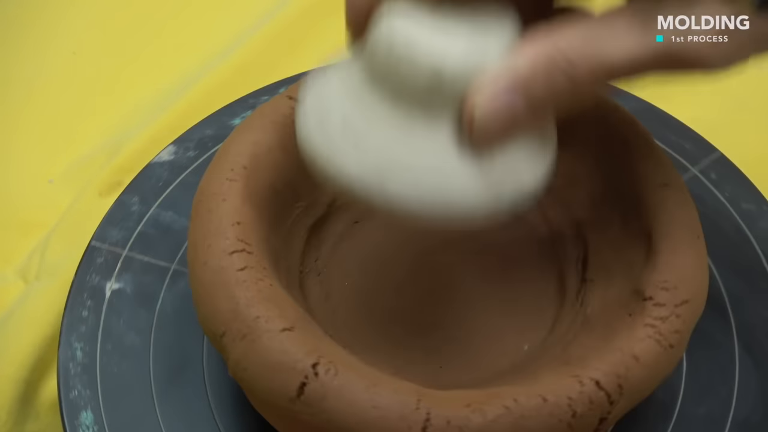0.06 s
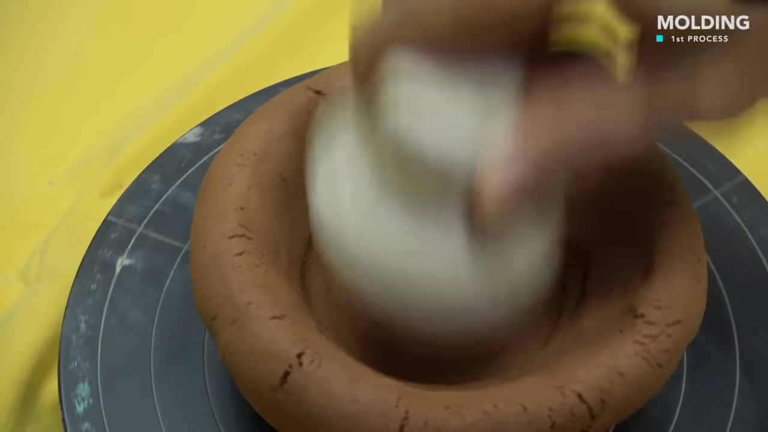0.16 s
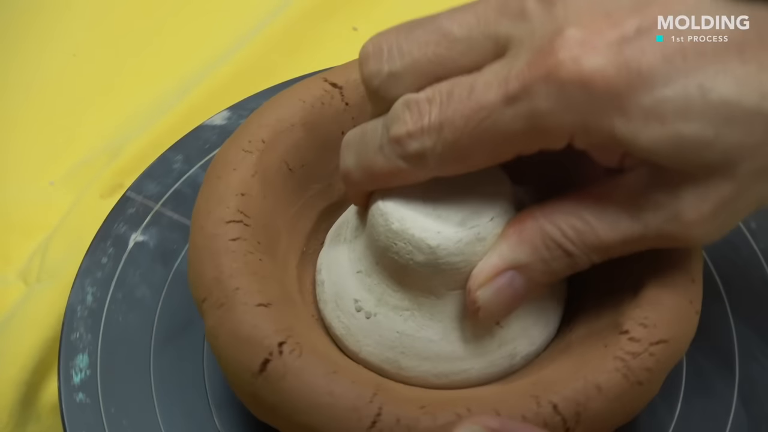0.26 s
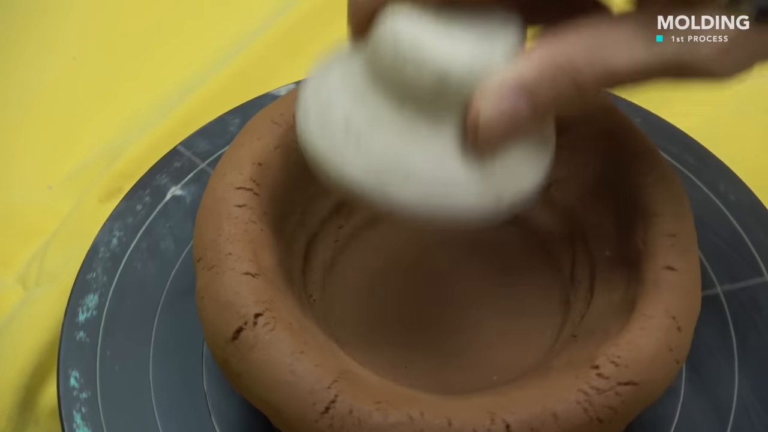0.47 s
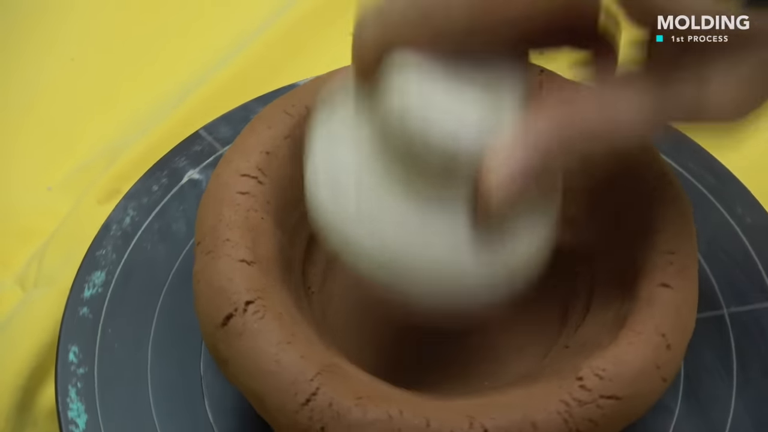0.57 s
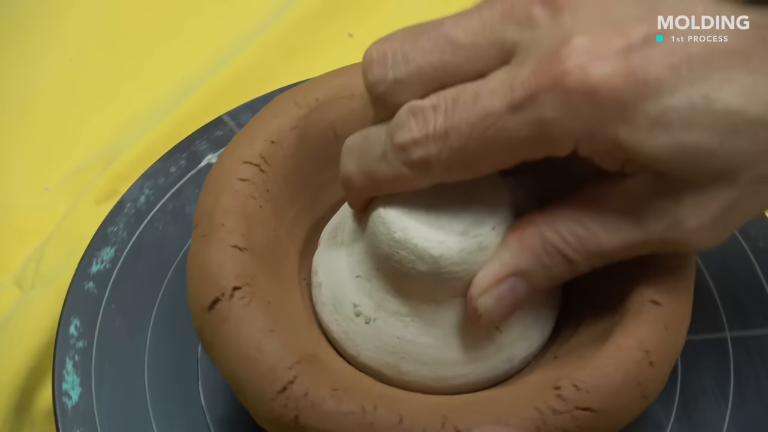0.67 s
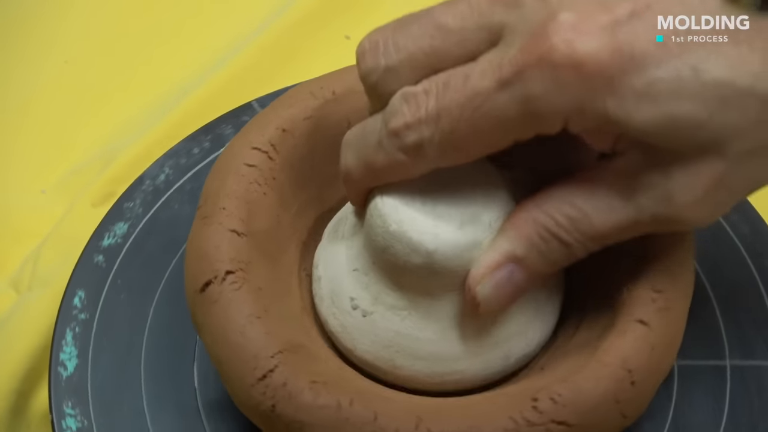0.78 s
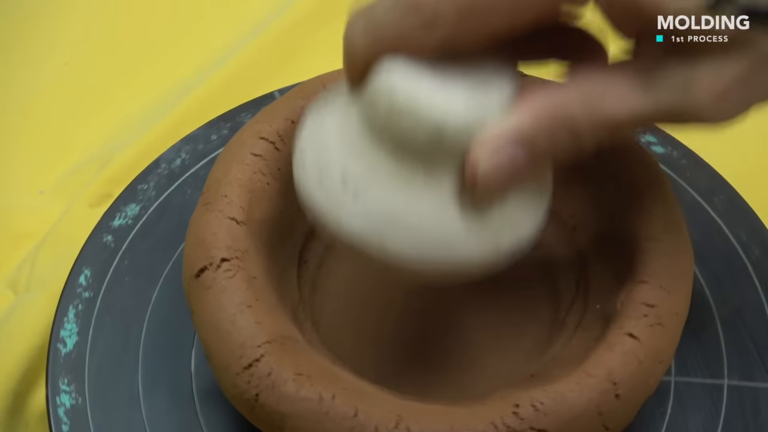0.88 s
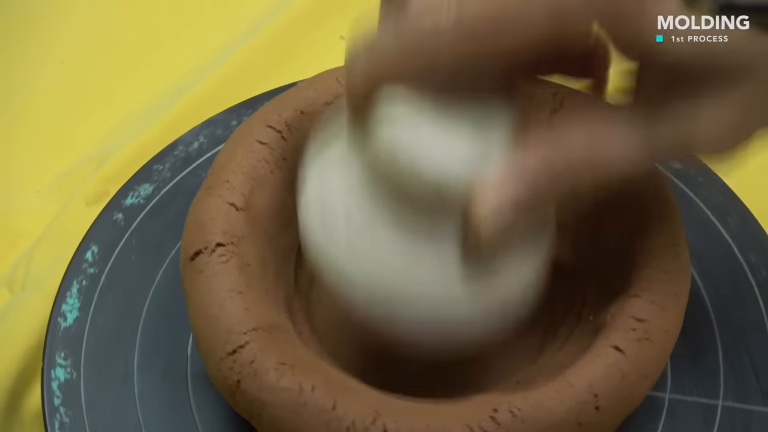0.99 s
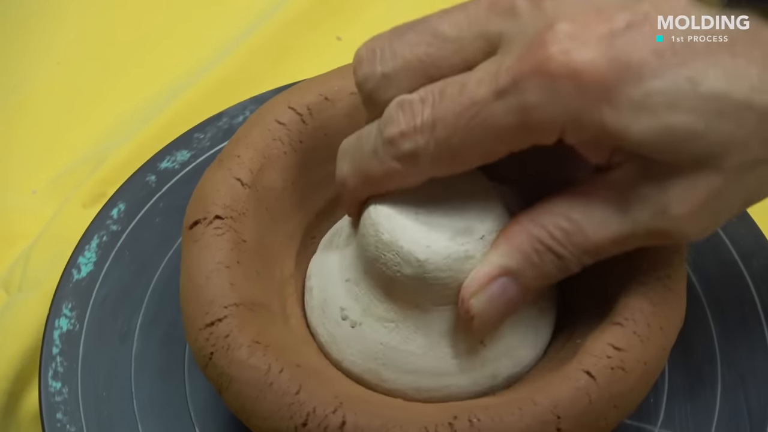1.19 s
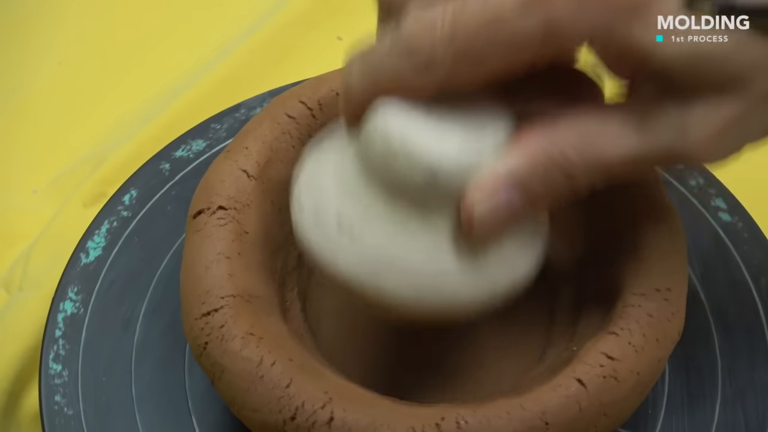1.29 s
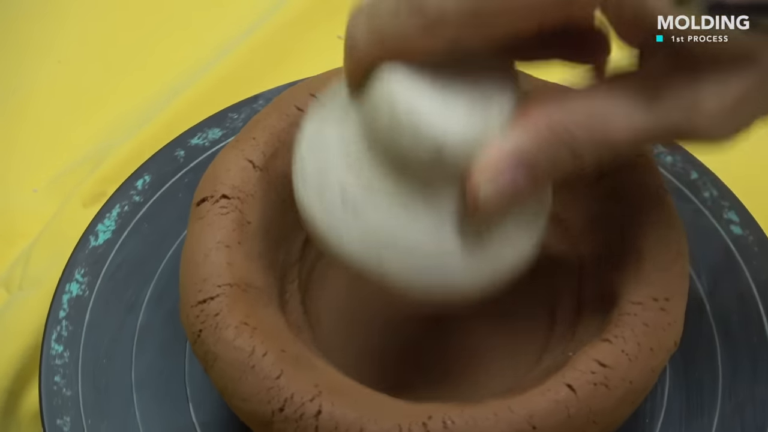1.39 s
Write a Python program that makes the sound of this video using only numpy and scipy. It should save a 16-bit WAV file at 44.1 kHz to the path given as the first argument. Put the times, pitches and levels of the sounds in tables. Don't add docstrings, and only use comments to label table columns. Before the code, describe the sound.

A rounded tool slaps into a soft clay bowl at about 0.23, 0.66 and 1.08 seconds. The first is hardest and ringing, the second dull and broad, the third softer, hollow and airier, each with a damped thud. The fading room tail of an earlier blow opens the scene. Faint sticky ticks fall between; low rumble wavers beneath, with a barely audible distant bump near 1.4. Close stereo, bare room.

```python
import sys
import numpy as np
from scipy import signal
from scipy.fft import rfft, irfft, next_fast_len
from scipy.io import wavfile

SR = 44100
rng = np.random.default_rng(int(sys.argv[2]) if len(sys.argv) > 2 else 0)


def invert_db(x):
    u = np.asarray(x, float) / 20
    return 10 ** u


def persist_wave(psi):
    counts = np.round(np.clip(psi, -1, 1) * 32767).astype(np.int16)
    wavfile.write(sys.argv[1], SR, np.atleast_2d(counts).T)


N = 63945
PAD = 13230
LEAD_S = .03

BLOW_TIMES = [-.19, .2335, .6610, 1.0751]
# slap level/dB, squeezed air level/dB, thud sent to the room level/dB
BLOWS = [
    (-15, -28, 8),
    (-5.5, -39, -5.5),
    (-6.5, -43.5, -9.5),
    (-10, -36, -2),
]
SLAP_SWEEPS = [.0005, .0003, .0007, .0003]
# f/Hz, width/Hz, level/dB
CAVITIES = [
    [(890, 290, 13.5), (3470, 940, 16), (6100, 700, 11.5), (9700, 1500, 5), (13000, 2000, -11)],
    [(600, 760, 3.5), (884, 73, 6), (1460, 270, 6.5), (2270, 270, 2), (4030, 240, -7.5), (6800, 2100, -10),
     (9770, 960, -10), (13200, 1500, -18)],
    [(780, 650, -2), (1300, 1000, -18), (2020, 230, -16), (3860, 1670, -7.5), (6620, 330, -10.5),
     (9390, 2140, -8.5), (12300, 700, -11), (14800, 610, -31)],
    [(740, 400, -3), (1390, 420, -1.5), (2130, 360, 7), (2280, 170, 7.5), (4540, 440, -24), (5930, 1060, 1),
     (7900, 400, -6), (9600, 620, -12), (14100, 1600, -14)],
]
# f/Hz, then level/dB in each of the four blows
THUD_MODES = [(63.2, -30, -16, -16.5, -16.5), (128, -31, -11, -5.5, -14), (148.8, -16.5, -7, -4, -11),
              (202.7, -34, -9, -6.5, -14), (315.4, -4, -23, -7.5, -14.5), (347.5, -9, -8, -5.5, -8.5),
              (392, 2.5, -3, -0.5, -10.5), (468.3, -28, -3.5, -9.5, -49)]
# t/s, level/dB, length/s, lowest f/Hz
TICKS = [
    (0.0516, -37.5, 0.0015, 5000),
    (0.169, -54, 0.024, 2500),
    (.526, -51.5, 0.0088, 2980),
    (.611, -52, 0.0011, 5000),
    (0.993, -54, .003, 2500),
    (1.235, -51, 0.0059, 5000),
]
RIM_DELAYS = [.00047, .0011]
RIM_LEVELS = [-4, -8]
# f/Hz, level/dB, t60/s
ROOM = [(59.5, -18, 0.22), (152, -21.5, 0.5), (393, -17.5, 0.34), (1020, -29.5, 0.47), (2870, -30, 0.43),
        (7200, -32.5, 0.37), (15000, -37.5, 0.27)]
# f/Hz, level/dB
RUMBLE = [(15, -42), (25, -13), (97, -7.5), (335, -16.5), (775, -19), (962, -30.5), (1790, -35),
          (3920, -43), (16000, -54.5)]
# t/s, level/dB
RUMBLE_SWELL = [(0, 6), (.2, -2), (.5, 3.5), (.65, -1.5), (.9, 3), (1.02, -2.5), (1.3, 4.5), (1.45, -3.5)]
# f/Hz, level/dB
PORT_LEVEL = [(30, -3.7), (130, -6), (300, -2), (600, -.3), (1200, -4), (2300, -5.5), (4500, -1),
              (12000, -.3)]
# f/Hz, phase/rad
PORT_PHASE = [(0, 0), (6630, 0.16), (7490, -0.1), (7750, 0.092), (8870, -0.034), (16500, 0.13)]
# f/Hz, level/dB
UNSHARED = [(60, -32), (500, -22), (2000, -29), (5000, -15), (9000, -5), (15000, -21)]


def slaps():
    puff_s, puff_top_hz, sweep_scatter = 0.0069, 5000, 0.562
    size = SR // 5
    t = np.arange(size) / SR - LEAD_S
    hz = np.arange(size // 2 + 1) * SR / size
    parts = []
    for s, sweep_s, (db, puff_db, _), peaks in zip(BLOW_TIMES, SLAP_SWEEPS, BLOWS, CAVITIES):
        scatter = np.interp(hz, np.arange(0, SR, 1500), rng.uniform(-1, 1, 30))
        lag = LEAD_S + sweep_s * (hz / 10000 + sweep_scatter * (1 + scatter))
        click = np.exp(-2j * np.pi * np.cumsum(lag) * SR / size)
        puff = invert_db(puff_db) * (t < 0) * np.exp(t / puff_s) * rng.standard_normal(size)
        puff = rfft(puff) / (1 + (hz / puff_top_hz) ** 4)
        slap = irfft((click + puff) * cavity(peaks, hz), size)
        parts.append((s, invert_db(db + 22) * slap))
    return place(parts)


def cavity(peaks, hz):
    w = np.maximum(hz, 20)
    power = sum(invert_db(2 * db) / (1 + ((w * w - f * f) / (w * width)) ** 2) for f, width, db in peaks)
    cepstrum = irfft(.5 * np.log(power))
    cepstrum[1:len(hz) - 1] *= 2
    cepstrum[len(hz):] = 0
    return np.exp(rfft(cepstrum))


def place(parts):
    line = np.zeros(PAD + N + SR)
    for s, part in parts:
        i = PAD + int((s - LEAD_S) * SR)
        line[i:i + len(part)] += part
    return line[:PAD + N]


def thuds(sent):
    rise_cycles, ring_cycles = 1.5, 16
    t = np.maximum(np.arange(SR // 2) / SR - LEAD_S, 0)
    parts = []
    for k, (s, (db, _, room_db)) in enumerate(zip(BLOW_TIMES, BLOWS)):
        thud = 0
        for hz, *levels in THUD_MODES:
            decay = invert_db(levels[k] - 60 * t * hz / ring_cycles)
            rise = 1 - np.exp(-t * hz / rise_cycles)
            thud = thud + decay * rise * np.sin(2 * np.pi * hz * t)
        parts.append((s, invert_db(db + sent * room_db) * thud))
    return place(parts)


def ticks():
    top_hz = 12100
    return place([(s, invert_db(db) * band_pass(burst(length_s), low_hz, top_hz))
                  for s, db, length_s, low_hz in TICKS])


def burst(length_s):
    t = np.arange(SR // 5) / SR - LEAD_S
    return np.exp(-(t / length_s) ** 2) * rng.standard_normal(len(t))


def band_pass(x, low_hz, high_hz, order=2):
    return signal.sosfilt(signal.butter(order, [low_hz, high_hz], "band", fs=SR, output="sos"), x)


def direct(bright):
    level_db, low_hz, high_hz = -2, 1480, 14500
    bounces = sum(invert_db(db) * np.roll(bright, int(s * SR)) for s, db in zip(RIM_DELAYS, RIM_LEVELS))
    near = invert_db(level_db) * (bright + bounces)
    return band_pass(signal.fftconvolve(near, near_wall())[:PAD + N], low_hz, high_hz, order=1)


def near_wall():
    delay_s, smear_s, level_db = .0073, .00015, -10
    t = np.arange(SR // 50) / SR - delay_s
    wall = np.exp(-(t / smear_s) ** 2) * rng.standard_normal(len(t))
    wall = invert_db(level_db) * wall / np.sqrt(np.sum(wall ** 2))
    wall[0] = 1
    return wall


def room_tail():
    start_s, swell_s, early_db = 0.0049, 0.014, -4
    t = np.arange(SR) / SR
    early = invert_db(early_db) * (t > .002)
    swell = early + 1 - np.exp(-np.maximum(t - start_s, 0) / swell_s)
    tail = 0
    for hz, noise in bands(SR):
        t60 = at_hz(ROOM, hz, axis=2)
        tail = tail + invert_db(at_hz(ROOM, hz) - 60 * t / t60) * noise
    return swell * tail


def bands(size):
    settle = 4000
    edges = 22 * 2 ** np.arange(0, 9.8, .5)
    white = rng.standard_normal((2, size + settle))
    for k, (low, high) in enumerate(zip(edges, edges[1:])):
        yield np.sqrt(low * high), band_pass(white[k % 2], low, high)[settle:]


def at_hz(points, hz, axis=1):
    p = np.array(points)
    return np.interp(np.log(np.maximum(hz, 1)), np.log(p[:, 0]), p[:, axis])


def bump():
    time_s, hz, level_db, length_s = 1.4, 78, -44.5, 0.046
    t = np.arange(N) / SR - time_s
    return invert_db(level_db) * np.exp(-(t / length_s) ** 2) * np.sin(2 * np.pi * hz * t)


def rumble():
    level_db, patchy_db, swell_top_hz = -41, 1.5, 1000
    swell = np.interp(np.arange(N) / SR, *np.transpose(RUMBLE_SWELL))
    out = 0
    for hz, noise in bands(N):
        slow = np.interp(np.arange(N), np.linspace(0, N, 16), rng.standard_normal(16))
        swell_here = swell / (1 + (hz / swell_top_hz) ** 2)
        out = out + invert_db(at_hz(RUMBLE, hz) + patchy_db * slow + swell_here) * noise
    return invert_db(level_db) * out / np.std(out)


def heard(bright):
    room = signal.fftconvolve(bright + thuds(True), room_tail())[:PAD + N]
    return (room + direct(bright) + thuds(False))[PAD:] + rumble() + bump()


def scene():
    bright = slaps() + ticks()
    size = next_fast_len(N + 4096)
    hz = np.arange(size // 2 + 1) * SR / size
    mid = rfft(heard(bright), size)
    apart = 1j * rfft(heard(bright), size) * invert_db(at_hz(UNSHARED, hz))
    port = invert_db(at_hz(PORT_LEVEL, hz) / 2) * np.exp(.5j * at_hz(PORT_PHASE, hz))
    return np.array([irfft(mid * port + apart, size), irfft(mid / port - apart, size)])[:, :N]


def roll_off(x):
    return signal.sosfilt(signal.butter(12, 16850, fs=SR, output="sos"), x)


def record(dry):
    low_hz, top_hz, ceiling = 45.5, 17000, .8
    mix = signal.sosfilt(signal.butter(2, low_hz, "high", fs=SR, output="sos"), dry)
    mix = ceiling * np.tanh(mix / ceiling)
    mix = signal.sosfilt(signal.cheby2(16, 60, top_hz, fs=SR, output="sos"), mix)
    return roll_off(mix)


dry = scene()
out = record(dry)
persist_wave(out)
```